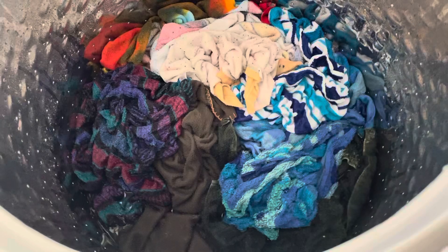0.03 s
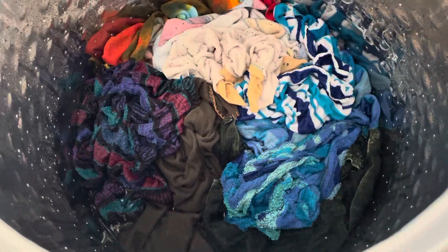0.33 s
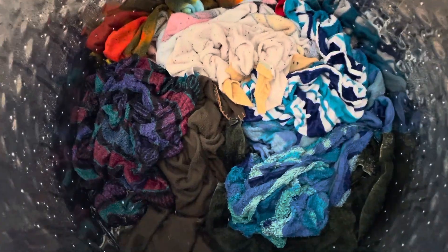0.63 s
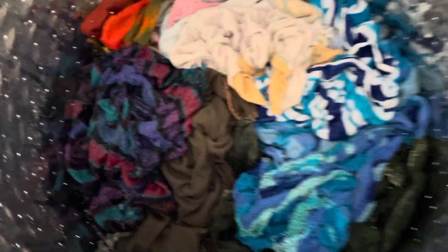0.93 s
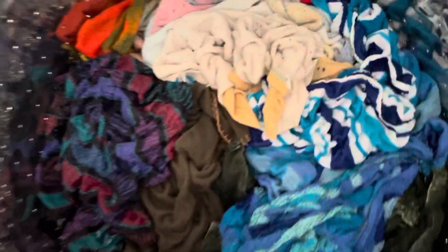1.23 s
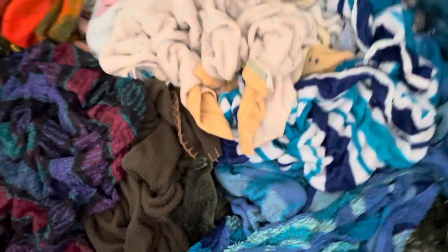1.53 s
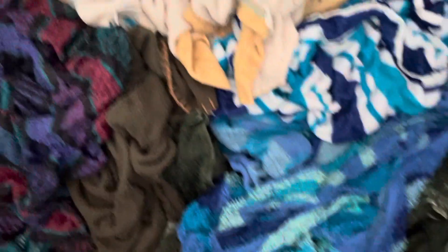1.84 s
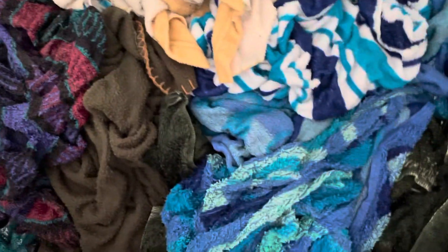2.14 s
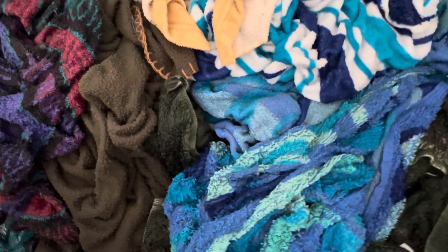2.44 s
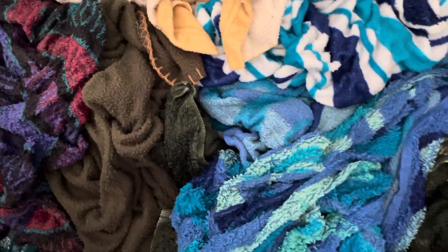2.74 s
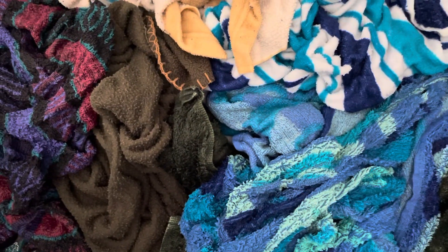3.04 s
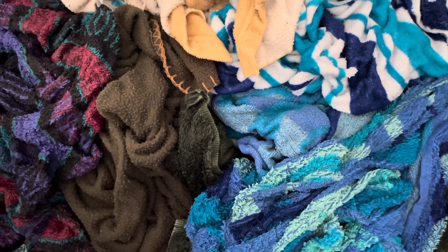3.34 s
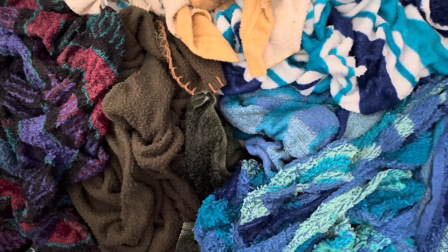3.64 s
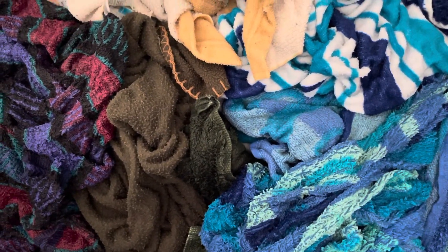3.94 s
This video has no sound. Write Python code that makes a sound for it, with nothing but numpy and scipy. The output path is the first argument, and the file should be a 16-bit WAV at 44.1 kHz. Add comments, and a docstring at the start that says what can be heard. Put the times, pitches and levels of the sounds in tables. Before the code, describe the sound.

A washing machine drains, its pump humming over a low rumble and churning water. Small gurgles and faint drips on steel come and go. The hum grows louder and hollower as the microphone moves from the open door into the drum.

```python
"""Washing machine draining, door to drum.

The microphone moves from outside the open door to deep inside the steel drum. The mains-driven pump
hums and shakes the tub; water churns in the impeller and rings the drum's resonances. Now and then
the drain gurgles, bubbles ring and drips tick on the steel, over thin whistles and a faint hiss."""
import sys
import numpy as np
from scipy import signal
from scipy.fft import rfft, irfft
from scipy.io import wavfile

SR = 44100
rng = np.random.default_rng(int(sys.argv[2]) if len(sys.argv) > 2 else 0)


def to_wav(s):
    """Save 16-bit WAV."""
    ch = np.atleast_2d(s).T  # columns
    pcm = np.round(np.clip(ch, -1, 1) * 32767)  # PCM
    wavfile.write(sys.argv[1], SR, pcm.astype(np.int16))


N = 176400
T = np.arange(N) / SR
OPPOSED = np.array([[1], [-1]])  # side signal: added on the left, subtracted on the right
PUMP_HZ = 60.0

# Hum at twice the pump rate, on the way in: (time [s], relative level [dB])
HUM_LEVEL = [(0.06, -35.5), (.4, -35), (.7, -30.5), (1.3, -30), (1.75, -24), (2.35, -23), (2.52, -26.5),
             (2.72, -21.5), (3.4, -28), (4, -28)]
# Weaker pump tones: (multiple of the pump rate, level at each of the four microphone depths [dB])
PUMP_TONES = [(1, -52.5, -44, -45, -46.5), (3, -43, -48.5, -49.5, -46.5)]
# Colour of the shaking tub: (frequency [Hz], density [dB])
RUMBLE_SPECTRUM = [(25, -38), (40, -27), (52, -18), (66, -8.5), (76, -11.5), (85, 1.5), (97, 3.5),
                   (112, -4), (130, -2), (143, -10), (158, -12.5), (180, -19), (230, -18.5), (400, -62.5)]
# Tub rumble on the way in: (time [s], relative level [dB])
RUMBLE_LEVEL = [(0.06, -34), (.5, -36.5), (.65, -30), (.95, -31), (1.3, -28), (1.6, -23.5), (1.9, -27),
                (2.3, -25), (2.55, -29.5), (2.72, -23), (3.05, -25.5), (3.3, -28), (3.65, -22.5), (4, -26)]
# Where hum and rumble sit in the stereo image: (time [s], left minus right [dB])
BASS_PAN = [(0, 1.7), (1.5, 1.25), (4, -0.45)]
def pump():
    """The mains-driven pump hums and shakes the tub, louder as the microphone goes in."""
    waver_db = 0.72 * drift(9.3)
    hum = from_db(in_time(HUM_LEVEL) + 0.9 + waver_db) * tone(2 * PUMP_HZ)
    hum += sum(by_depth(levels) * tone(multiple * PUMP_HZ) for multiple, *levels in PUMP_TONES)
    rumble = from_db(in_time(RUMBLE_LEVEL) - 3) * stereo_noise(RUMBLE_SPECTRUM, side_db=-19.5)
    return (hum + rumble) * from_db(OPPOSED * in_time(BASS_PAN) / 2)


# Sixth pump tone, common to both channels: (level at each depth [dB])
THROB_MID = [-42.5, -41, -37, -43.5]
# The drum's main standing wave, driven by that tone, opposed: (level at each depth [dB])
THROB_SIDE = [-61, -39, -29.5, -31.5]
def throb(slosh_hz=7.2, swell=0.56, bend_rad=1.1):
    """The pump's sixth tone swells and bends with each slosh of the water."""
    slosh = glide(slosh_hz * (1 + .2 * drift(5.6))).imag
    wave = rms_one((1 + swell * slosh) * np.sin(2 * np.pi * 6 * PUMP_HZ * T + bend_rad * slosh))
    return wave * (by_depth(THROB_MID) - OPPOSED * by_depth(THROB_SIDE))


def water_flow():
    """Strength of the flow: it surges, flutters and pulses once per turn of the impeller."""
    surge_db = -0.48 * drift(27)
    flutter_db = 2.5 * drift(60)
    pulse = np.exp(0.12 * np.cos(2 * np.pi * PUMP_HZ * T))
    return from_db(surge_db + flutter_db) * pulse


def turbulence(flow, splashes_per_s=72, decay_s=.006):
    """Rushing noise and small, short splashes, both following the flow."""
    sizes = from_db(3 * np.minimum(rng.exponential(1, N), 3))
    onsets = rng.random(N) < splashes_per_s / SR
    power = signal.lfilter([1], [1, -np.exp(-2 / (decay_s * SR))], sizes ** 2 * onsets + 1e-18)
    rush = white()
    splashes = rms_one(np.sqrt(power) * white())
    return flow * (rush + 0.44 * splashes)


# Water from outside the door and from deep in the drum, mid and side: (frequency [Hz], density [dB])
MID_OUTSIDE = [(170, -3), (300, 5.5), (420, 2), (500, -7), (750, -11.5), (1100, -15.5), (2000, -23),
               (2800, -26), (4300, -32), (5000, -35.5), (7000, -53.5)]
MID_INSIDE = [(170, -3.5), (230, 2.5), (300, -2), (460, 5), (620, -15.5), (800, -17.5), (1100, -21.5),
              (1700, -20.5), (2800, -27), (4200, -32.5), (7000, -56)]
SIDE_OUTSIDE = [(170, -1), (280, 1), (420, 4), (560, -11.5), (800, -7.5), (1200, -18), (1900, -22.5),
                (2700, -26.5), (4500, -34), (7000, -46.5)]
SIDE_INSIDE = [(130, -30), (220, 8), (300, 3), (430, -3.5), (600, 1.5), (800, -29.5), (1100, -29),
               (1700, -33), (2500, -30.5), (4500, -37), (7000, -47.5)]
def churn(flow):
    """Water churns in the impeller: a wash that changes colour as the microphone enters the drum."""
    inside = np.clip(in_time(MIC_DEPTH) / 3, 0, 1)
    def blend(outer, inner):
        far = colour(turbulence(flow), outer)
        near = colour(turbulence(flow), inner)
        return np.sqrt(1 - inside) * far + np.sqrt(inside) * near
    mid = by_depth([-40, -39, -39.5, -40.5]) * blend(MID_OUTSIDE, MID_INSIDE)
    side = by_depth([-46, -39, -40, -40]) * blend(SIDE_OUTSIDE, SIDE_INSIDE)
    return mid + OPPOSED * side


# Resonances in the drum: (frequency [Hz], width [Hz], level at each of the four depths [dB],
# left minus right [dB], phase between channels [rad])
DRUM_MODES = [(353, 33.3, -49.5, -34, -31.5, -30, -3, 2.95), (528.4, 99, -65, -41, -39, -48.5, -2, 2.58),
              (588, 34, -56, -45.5, -50, -42, 0, 2.61), (675.6, 88, -51, -47, -53.5, -57.5, 1, 0.23),
              (923, 71, -63.5, -63.5, -58, -58, 5, 1.6), (1237, 57, -66, -65, -68.5, -58, 5.5, 2),
              (1387, 23, -62, -62, -65.5, -61, 6.5, 1.9), (1574, 58, -68, -60.5, -58.5, -57, 4.5, 1.57),
              (1646, 120, -69.5, -62, -65.5, -58.5, 1.5, 2), (2142, 75, -68, -63, -67.5, -61.5, 5.5, 2.1),
              (2720, 190, -67.5, -72.5, -73.5, -74.5, -3, 0.79),
              (4146, 320, -71, -72.5, -79, -85.5, -4, .4)]
def drum(flow):
    """The water drives standing waves; each has its own level wherever the microphone stands."""
    drive = flow ** 0.66  # only part of the flow's swing reaches them
    modes = 0
    for hz, width_hz, *levels, pan_db, phase in DRUM_MODES:
        wave = signal.hilbert(resonate(drive * white(), hz, width_hz))
        modes += by_depth(levels) * place(wave, pan_db, phase)
    return modes


# Gulps down in the drain: (time [s], relative body level [dB], relative spray level [dB], decay [s])
GURGLES = [(0.088, -41.5, -51, 0.02), (0.382, -38, -64, 0.0087), (0.58, -46, -58, 0.0094),
           (0.744, -44, -51, 0.015), (0.916, -43, -55, 0.0087), (0.973, -39, -51, 0.024),
           (1.079, -41, -48, 0.022), (1.191, -38, -52.5, 0.015), (1.244, -37.5, -49, 0.015),
           (1.33, -49, -49.5, 0.02), (1.386, -41, -53.5, 0.022), (1.493, -42, -58, 0.012),
           (2.163, -41, -41, 0.014), (2.274, -39, -61, 0.018), (2.346, -39.5, -55, 0.023),
           (2.496, -39, -61, 0.017), (2.629, -46, -49, 0.012), (2.749, -41, -47.5, 0.017),
           (3.25, -33.5, -48.5, .009), (3.53, -39, -52, .016), (3.85, -40, -64, 0.011)]
# Colours of a gulp's body and spray: (frequency [Hz], density [dB])
BODY_SPECTRUM = [(250, -23), (500, 2.5), (750, -5), (1100, -11), (1600, -4), (2300, -26.5), (4000, -38.5)]
SPRAY_SPECTRUM = [(1000, -13), (2000, 3.5), (3000, 0), (5500, -16.5), (10000, -42.5)]
def gurgles(rise_s=0.0017):
    """The drain gulps air: short bursts with a hollow body and a brighter spray."""
    body = spray = 0
    for start, body_db, spray_db, decay_s in GURGLES:
        envelope = burst(start, rise_s, decay_s)
        body += from_db(body_db + 1) * envelope
        spray += from_db(spray_db + 1) * envelope
    return body * stereo_noise(BODY_SPECTRUM, 0.5) + spray * stereo_noise(SPRAY_SPECTRUM, -3)


# Larger bubbles, left of the microphone: (time [s], pitch [Hz], relative level [dB])
BUBBLES = [(1.243, 711, -35.5), (1.244, 1530, -44.5), (1.33, 1526, -46.5), (1.334, 1020, -41.5),
           (2.271, 1130, -46), (2.347, 1140, -46), (3.417, 1640, -47), (3.43, 1638, -48.5)]
def bubbles(decay_s=.014, rise_per_s=.8):
    """Pockets of air ring briefly and rise in pitch."""
    rings = 0
    for start, hz, db in BUBBLES:
        pitch = hz * (1 + rise_per_s * np.maximum(T - start, 0))
        rings += from_db(db + 5) * burst(start, 2 / hz, decay_s) * glide(pitch)
    return place(rings, pan_db=5, phase=1.2)


# Drops around the microphone: (time [s], ring [Hz], relative ring level [dB], relative snap level [dB])
DRIPS = [(0.2943, 4420, -56, -81), (0.7328, 6450, -64, -67), (0.7647, 5960, -62, -77.5),
         (1.4367, 5130, -57.5, -80), (1.471, 4500, -68, -62), (1.7025, 5130, -47, -59),
         (1.785, 5210, -70, -56), (1.9964, 5260, -73, -66), (2.075, 5800, -59.5, -69),
         (2.0947, 5500, -59, -58), (2.238, 5000, -67, -75), (2.516, 5250, -60, -64.5),
         (2.719, 4900, -70, -74.5), (2.929, 4730, -59, -67.5), (2.962, 4730, -69.5, -69),
         (3.1604, 4800, -76, -63), (3.2236, 5280, -64.5, -79)]
# Colour of a drop's impact: (frequency [Hz], density [dB])
SNAP_SPECTRUM = [(3000, -13), (6000, 1), (9000, 0.5), (11500, 9.5), (15500, -10)]
def drips(ring_s=0.0061, snap_s=0.0019, spatter_s=0.011):
    """Drops tick on the steel: a bright snap, a little spatter after it and a brief high ring."""
    rings = snaps = 0
    for start, hz, ring_db, snap_db in DRIPS:
        ring = burst(start, 0.00046, ring_s) * resonate(white(), hz, width_hz=420)
        rings += from_db(ring_db + 3) * ring
        spatter = from_db(-13) * burst(start, snap_s, spatter_s)
        snaps += from_db(snap_db + 9) * (burst(start, 0.00048, snap_s) + spatter)
    return rings + snaps * stereo_noise(SNAP_SPECTRUM, side_db=-4)


# Hollow ring on the left, shifting as the microphone moves: (time [s], pitch [Hz], relative level [dB])
HOLLOW_RING = [(.4, 1747, -57.5), (.9, 1747, -62), (1.3, 1745, -56.5), (1.7, 1820, -54.5),
               (2.03, 1803, -53), (2.3, 1800, -68.5)]
def hollow_ring(flow, width_hz=29):
    """A narrow band of noise rings and flutters with the flow."""
    times, hz, db = np.transpose(HOLLOW_RING)
    gain = flow * from_db(np.interp(T, times, db) - 1.5)
    band = (drift(width_hz) + 1j * drift(width_hz)) * glide(np.interp(T, times, hz))
    return place(gain * band, pan_db=7.5, phase=1.2)


# Centred whistle, clearest at the drum's mouth: (time [s], level [dB])
WHISTLE_LEVEL = [(1.3, -70), (1.62, -61), (1.9, -60), (1.98, -68), (2.35, -73)]
def whistle(hz=2523, waver_hz=9):
    """A thin tone wavers in level and pitch."""
    gain = from_db(in_time(WHISTLE_LEVEL) + 2 * drift(6.7))
    return gain * rms_one(glide(hz + waver_hz * drift(23)).real)


# Faint high hiss with audio-coder gaps near 8 kHz (mid) and 11.5 kHz (side):
# (frequency [Hz], density [dB])
HISS_MID = [(4000, 4.5), (6500, 14.5), (8000, -19.5), (9500, 10), (12000, 6.5), (13500, -10),
            (16000, -13.5)]
HISS_SIDE = [(3000, -7.5), (7500, 3), (9500, -2), (11500, -23.5), (13500, -9.5), (15700, -1.5)]
def hiss():
    """Faint, slightly flickering hiss above the water."""
    flicker = from_db(2.5 * drift(25))
    mid = from_db(-73) * colour(white(), HISS_MID)
    side = from_db(-69) * colour(white(), HISS_SIDE)
    return flicker * (mid + OPPOSED * side)


# The microphone's path: (time [s], depth [0 outside, 1 at the door, 2 drum's mouth, 3 deep inside])
MIC_DEPTH = [(0, 0), (.6, .15), (1.05, .5), (1.3, 1.05), (1.6, 1.95), (2.0, 2.1), (2.27, 2.95), (4, 3)]
def by_depth(levels_db):
    """Gain along the microphone's path, from the levels at the four depths."""
    return from_db(np.interp(in_time(MIC_DEPTH), np.arange(len(levels_db)), levels_db))


def place(wave, pan_db, phase):
    """A complex wave reaches each side of the microphone with its own level and phase."""
    return np.real(wave * from_db(OPPOSED * pan_db / 2) * np.exp(.5j * OPPOSED * phase))


def stereo_noise(spectrum, side_db):
    """Coloured noise with independent mid and side; rms 1."""
    mid, side = colour(white(), spectrum), colour(white(), spectrum)
    return rms_one(mid + from_db(side_db) * OPPOSED * side)


def from_db(db):
    """Decibels to gain."""
    return 10 ** (np.asarray(db) / 20)


def rms_one(x):
    """Scale to unit rms."""
    return x / np.sqrt(np.mean(x ** 2) + 1e-20)


def in_time(rows):
    """A curve of (time [s], value) at every sample."""
    return np.interp(T, *np.transpose(rows))


def white():
    """Fresh white noise."""
    return rng.standard_normal(N)


def drift(hz):
    """Random wander, mostly slower than hz; rms 1."""
    step, settle = 40, 2000  # samples per point; points dropped while the filter settles
    pole = np.exp(-2 * np.pi * hz * step / SR)
    noise = rng.standard_normal(N // step + settle + 2)
    slow = signal.lfilter([1], [1, -2 * pole, pole * pole], noise)[settle:]
    return np.interp(np.arange(N) / step, np.arange(len(slow)), rms_one(slow))


def colour(x, spectrum):
    """Shape a signal by (frequency [Hz], density [dB]), falling 36 dB an octave past the ends; rms 1."""
    hz, db = np.transpose(spectrum)
    octave = np.log2(np.maximum(np.arange(N // 2 + 1) * SR / N, 1))
    known = np.log2(hz)
    beyond = np.abs(octave - np.clip(octave, known[0], known[-1]))
    gain = from_db(np.interp(octave, known, db) - 36 * beyond)
    return rms_one(irfft(rfft(x) * gain, N))


def resonate(x, hz, width_hz):
    """A steep-sided resonance, as two band-passes in a row; rms 1."""
    r = np.exp(-np.pi * width_hz * np.sqrt(2) / SR)
    section = [1 - r, 0, r - 1, 1, -2 * r * np.cos(2 * np.pi * hz / SR), r * r]
    return rms_one(signal.sosfilt([section, section], x))


def burst(start, rise_s, decay_s):
    """Envelope of a quick rise and an exponential decay."""
    age = np.maximum(T - start, 0)
    return (1 - np.exp(-age / rise_s)) * np.exp(-np.minimum(age / decay_s, 40))


def tone(hz):
    """A sine of rms 1."""
    return np.sqrt(2) * np.sin(2 * np.pi * (hz * T + rng.random()))


def glide(hz):
    """A complex sine that follows a pitch curve."""
    return np.exp(2j * np.pi * (np.cumsum(hz) / SR + rng.random()))


def scene():
    """Pump, water and drum at the microphone; one flow drives churn, resonances and hollow ring."""
    flow = water_flow()
    running = pump() + throb() + churn(flow) + drum(flow) + hollow_ring(flow) + whistle()
    return running + gurgles() + bubbles() + drips() + hiss()


def record(dry, start_s=.035, cutoff_hz=15800):
    """The sound starts abruptly; the highest treble is cut."""
    opened = np.clip((T - start_s) / .003, 0, 1)
    lowpass = signal.ellip(10, .1, 80, cutoff_hz, fs=SR, output="sos")
    return signal.sosfilt(lowpass, dry * opened)


dry = scene()
out = record(dry)
to_wav(out)
```